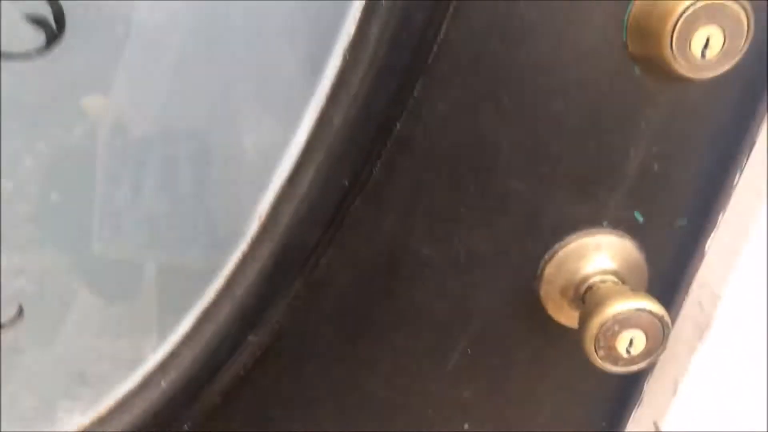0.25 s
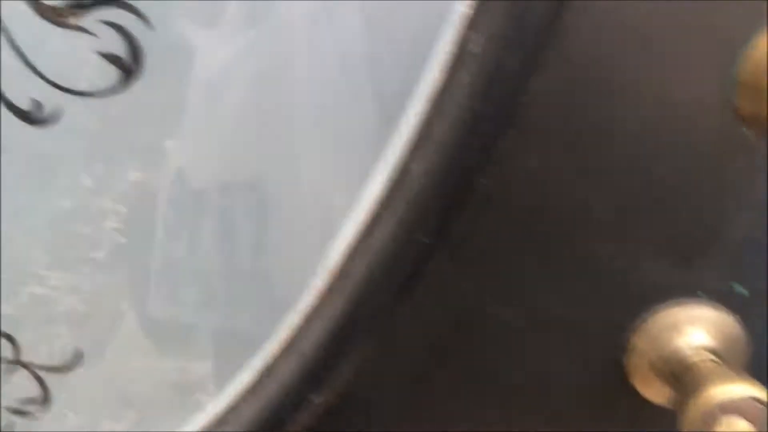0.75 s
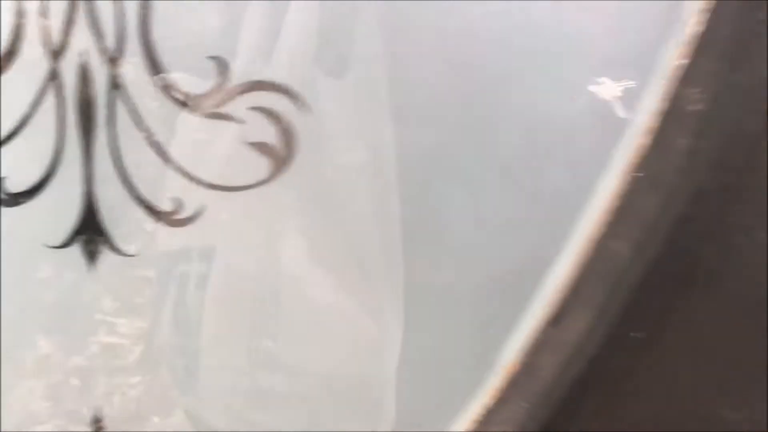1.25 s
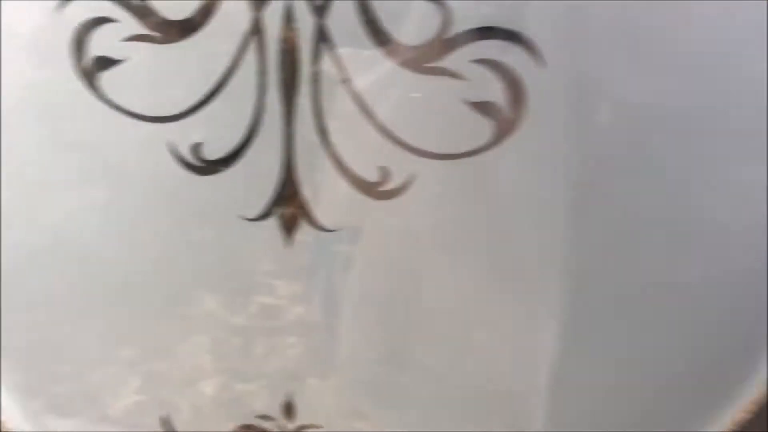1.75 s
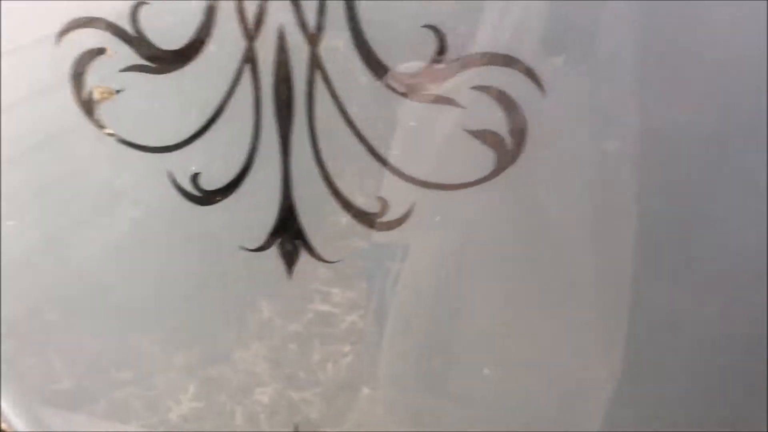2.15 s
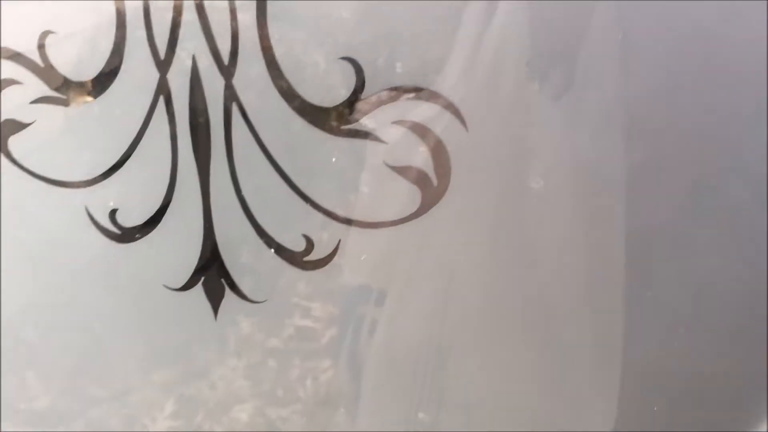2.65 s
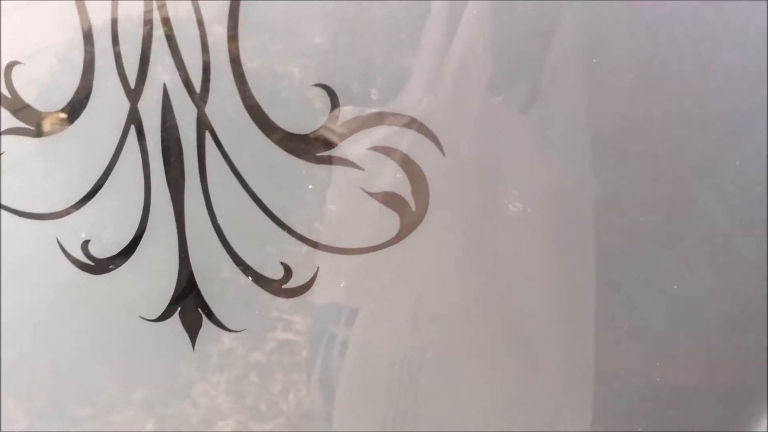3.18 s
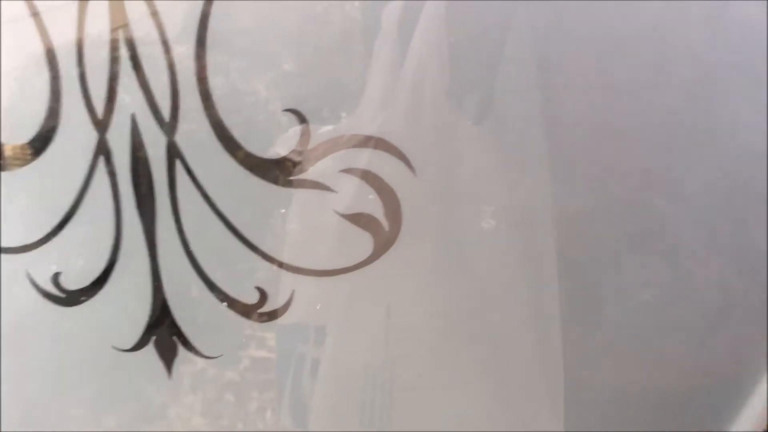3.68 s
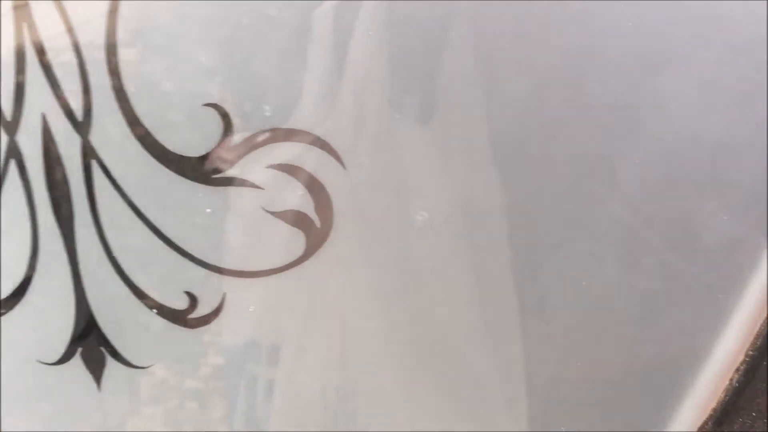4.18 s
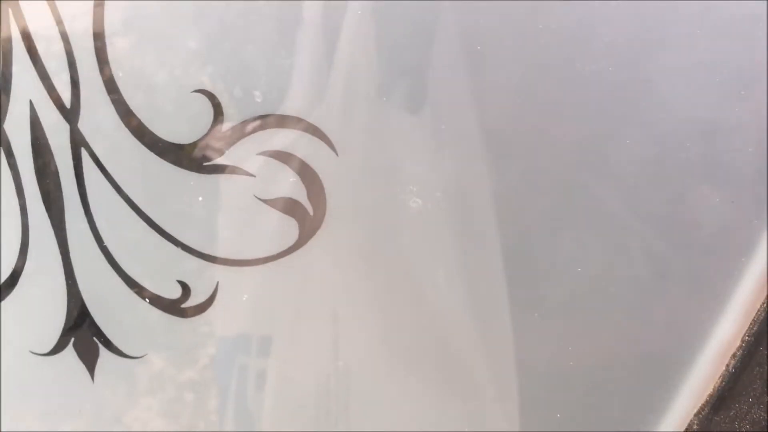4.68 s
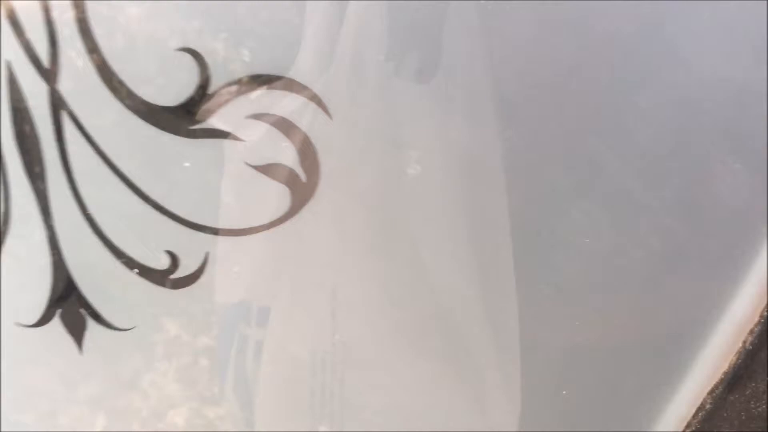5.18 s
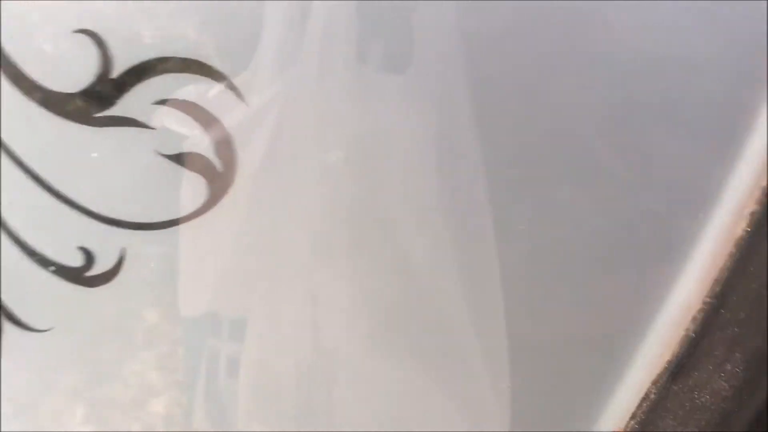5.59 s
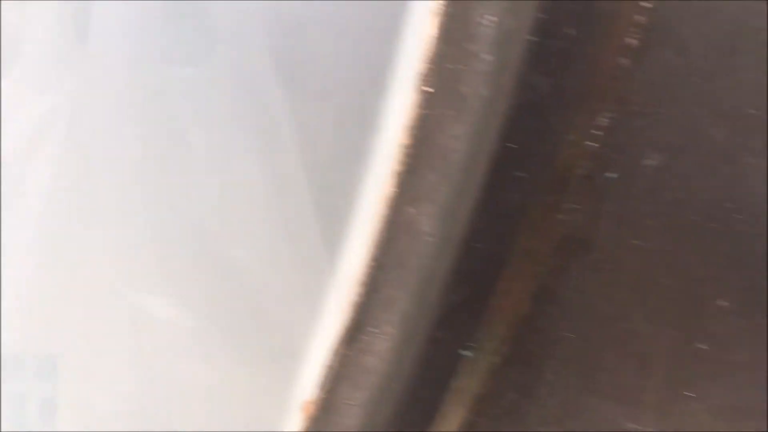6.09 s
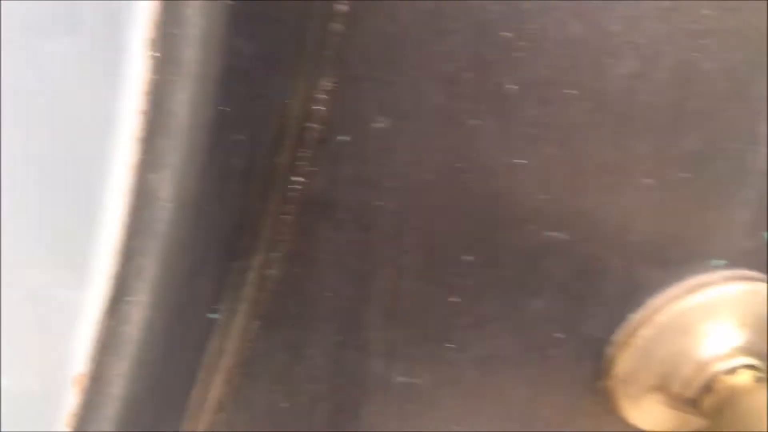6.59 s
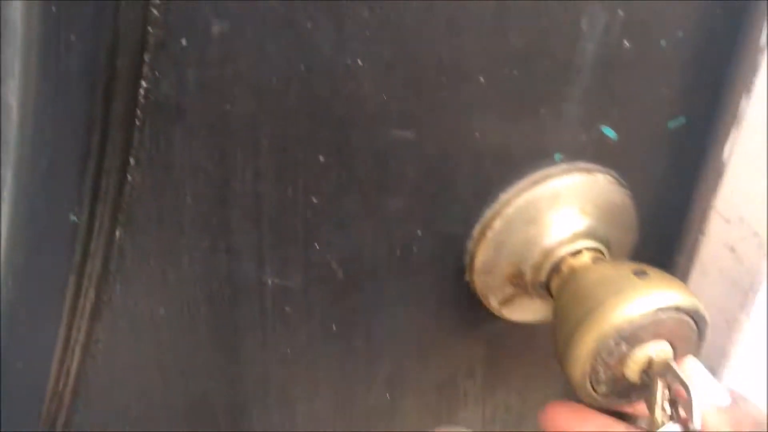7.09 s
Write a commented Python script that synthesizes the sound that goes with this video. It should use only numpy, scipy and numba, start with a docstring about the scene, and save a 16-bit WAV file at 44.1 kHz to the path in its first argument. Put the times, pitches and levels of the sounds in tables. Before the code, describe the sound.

Close to the microphone at a house entrance, a bunch of keys is turned over in a hand: dull, hollow clinks first, then scattered faint ticks, then a brighter jingle. After a sparse stretch with soft thumps, the keys rattle loudly and sharply into the lock, with one dead knock on the knob. Low traffic rumbles far off.

```python
"""A bunch of keys is dug out and turned over in a hand at a house door, then pushed into the lock.
Keys clink, ring and rattle: noisy contacts excite their pitches, the shanks and the hollow of the hand.
Short damped tones, one knock on the knob and low thumps join in, as bursts and dying tones.
Filtered noise makes the rustle, the rubbing, a broad hiss, and the far traffic under a faint hiss of air."""
import sys
import numpy as np
from scipy import signal
from scipy.fft import rfft, irfft
from scipy.io import wavfile
from scipy.ndimage import uniform_filter1d
from numba import njit

SR = 44100
rng = np.random.default_rng(int(sys.argv[2]) if len(sys.argv) > 2 else 0)


def transcribe(signal):
    """Save signal, clipped to [-1, 1], as a 16-bit WAV file at the path in sys.argv[1]."""
    frames = np.atleast_2d(signal).T
    limited = np.clip(frames, -1, 1)
    pcm = np.round(limited * 32767).astype(np.int16)
    wavfile.write(sys.argv[1], SR, pcm)


N = 323694  # length of the scene in samples

# In all tables t60_s is the time to fade by 60 dB.
# Clinks of key on key: peak_s, t60_s (at least 0.004), crack_db, body_db
CLINKS = [(0.111, 0.044, -66, -46), (0.144, 0.094, -42, -34.5), (0.179, 0.077, -36.5, -36),
          (0.2, 0.099, -42, -40), (0.2323, 0.02, -23, -24.5), (0.242, 0.025, -34, -28),
          (0.277, 0.009, -40, -31.5), (0.2995, 0.036, -30.5, -34), (0.3235, 0.0066, -43, -24.5),
          (0.34, .012, -50, -31.5), (0.363, 0.083, -44, -39), (.399, 0.013, -35, -24.5),
          (0.4097, 0.0075, -24.5, -30), (0.424, 0.0096, -55, -28.5), (0.473, 0.024, -58, -34.5),
          (0.491, .014, -59, -38), (0.542, 0.12, -36.5, -36.5), (0.5619, 0.01, -37, -21.5),
          (0.5772, 0.0088, -31, -24), (0.604, 0.011, -40, -35), (0.613, 0.018, -30.5, -43),
          (0.636, .015, -44, -39), (.665, 0.0089, -50, -49), (0.6767, 0.019, -33, -28.5),
          (0.701, 0.0057, -29, -24), (0.7416, 0.019, -37, -38), (0.7725, 0.0079, -48, -20),
          (0.7815, 0.029, -28, -29), (0.8894, 0.017, -47, -40), (0.954, 0.0063, -36, -38.5),
          (0.978, 0.19, -36.5, -50), (1.007, 0.014, -48, -40.5), (1.023, 0.011, -46, -39.5),
          (1.0635, 0.02, -53, -35), (1.101, 0.0051, -35, -44), (1.117, 0.013, -56, -41),
          (1.157, 0.049, -42, -44.5), (1.262, 0.04, -48, -46), (1.5657, 0.015, -42, -38.5),
          (1.5758, 0.011, -25.5, -32), (1.681, 0.048, -38.5, -64), (1.816, 0.0046, -32, -51),
          (2.0774, 0.035, -42.5, -58), (2.12, 0.029, -30, -43), (2.4495, 0.034, -40, -56),
          (2.5044, 0.015, -34.5, -44), (2.713, 0.046, -49.5, -55), (2.774, .015, -41.5, -52),
          (2.819, 0.016, -40, -50), (2.922, 0.055, -36, -46), (2.942, 0.031, -34, -46),
          (2.967, 0.069, -36, -44), (2.9837, 0.05, -36, -45), (3.004, 0.047, -30.5, -36.5),
          (3.0265, 0.023, -31, -38), (3.0303, 0.028, -25.5, -31.5), (3.06, 0.022, -51, -44),
          (3.119, 0.056, -32, -42.5), (3.136, .02, -45, -51), (3.201, 0.053, -25.5, -29),
          (3.234, 0.021, -28, -33), (3.254, 0.027, -23, -32), (3.295, 0.094, -31, -42.5),
          (3.311, 0.028, -31, -40), (3.353, 0.049, -32.5, -36), (3.376, 0.019, -25, -39),
          (3.404, 0.055, -54, -45.5), (3.4395, 0.025, -30, -46), (3.451, 0.034, -34, -56),
          (3.496, 0.03, -36.5, -45.5), (4.026, 0.016, -42.5, -49.5), (4.192, .015, -48, -65),
          (4.243, 0.066, -34.5, -51), (4.282, 0.018, -46, -54), (4.2917, 0.012, -38.5, -47.5),
          (4.359, 0.024, -44.5, -51.5), (4.383, 0.014, -50, -47.5), (4.399, 0.03, -38, -51),
          (4.511, 0.02, -57, -63), (4.527, .03, -42, -50), (4.9587, 0.0094, -74, -59),
          (5.035, 0.016, -58, -56.5), (5.181, 0.015, -63, -53.5), (5.206, 0.026, -70, -60.5),
          (5.358, 0.045, -34, -59), (5.437, 0.046, -31, -51), (5.5233, 0.067, -45, -43.5),
          (5.573, 0.014, -30.5, -42.5), (5.588, 0.016, -33, -48), (5.603, 0.0075, -56, -37),
          (5.7516, 0.023, -38, -56), (5.765, 0.023, -35, -68), (5.915, 0.019, -49, -41.5),
          (5.927, 0.03, -65, -39), (5.9348, 0.012, -65, -41), (6.1452, 0.006, -55, -37.5),
          (6.1632, 0.025, -30.5, -39), (6.2076, 0.029, -21, -45), (6.2607, 0.014, -22, -31.5),
          (6.274, 0.0068, -23, -43), (6.2813, 0.0088, -18.5, -54), (6.332, 0.013, -35.5, -47),
          (6.437, 0.013, -52, -45), (6.458, 0.021, -31.5, -57), (6.5021, 0.092, -32, -46),
          (6.5585, 0.012, -26.5, -58), (6.5668, 0.12, -28.5, -45.5), (6.599, 0.043, -32, -39),
          (6.6218, 0.023, -47, -25.5), (6.676, 0.016, -39, -37), (6.7035, 0.037, -27, -34.5),
          (6.732, 0.049, -25, -48), (6.771, 0.061, -25, -43), (6.8125, 0.019, -23, -44),
          (6.8815, 0.06, -26, -32), (6.903, 0.08, -41, -33), (6.948, 0.013, -43, -30.5),
          (6.9834, 0.0098, -25, -47), (6.986, 0.018, -21.5, -49), (7.0262, 0.017, -45, -56),
          (7.052, .008, -20.5, -41), (7.0587, 0.03, -17, -32), (7.0688, 0.024, -19.5, -32),
          (7.1027, 0.0066, -47, -37.5), (7.14, 0.013, -24, -47), (7.156, 0.0051, -12, -45),
          (7.192, 0.011, -33, -48), (7.205, 0.016, -23, -42), (7.2173, 0.025, -20.5, -42),
          (7.2298, 0.021, -22, -40), (7.243, 0.022, -27, -33), (7.273, .012, -28, -41),
          (7.281, 0.0081, -23, -41.5), (7.321, 0.016, -36, -39)]
# Short faint low thumps: start_s, level_db, t60_s (at most 0.3), bass_db (relative), bass_hz, edge_db (relative)
THUMPS = [(1.214, -48, 0.021, -9, 108, -2), (1.683, -48, 0.14, 11.5, 275, 5),
          (5.394, -59, 0.23, 3.5, 80.7, -30.5), (5.443, -42.5, 0.049, -3, 207, -35),
          (5.535, -46, 0.018, 3, 274, -22), (5.735, -51.5, 0.24, -24, 72.7, -34),
          (5.853, -41, 0.057, 5, 124, -22), (5.885, -48.5, 0.27, 12.5, 72.7, -28),
          (5.925, -43, 0.13, 0, 72.7, -8), (5.991, -36.5, 0.022, -29, 94.2, -7),
          (6.141, -46, 0.19, 6.5, 72.7, -9), (6.167, -50, 0.35, 16, 180, -3),
          (6.196, -41.5, 0.13, 9.5, 72.7, -10), (6.224, -48.5, 0.23, 19.5, 88.8, -19),
          (6.251, -25.5, 0.058, -18, 106, -10.5), (6.274, -40, 0.13, 9, 74, -34),
          (6.327, -44.5, 0.047, -1, 83.4, -14), (6.388, -44.5, 0.035, -10, 73, -12),
          (6.903, -34, 0.063, -15, 300, 3), (7.202, -51, 0.39, 6, 72.7, -20)]
# Pitches at which the keys ring: pitch_hz, level_db (halved in use), t60_s (cut to a fifth in the hand)
KEY_MODES = [(3620, -14, .1), (4560, -12, .1), (5130, -8, .12), (5770, -9, .15), (6350, -9, .1),
             (6980, -11, .1), (7790, -14, .15), (8300, -8, .1), (8620, -6, .06), (9050, -2, .2),
             (9900, -9, .1), (11125, -3, .15), (11760, -6, .2), (12460, -3, .2), (12670, -8, .15),
             (13290, -3, .15), (13960, -3, .12), (14298, -1, .2), (14790, -3, .12), (15325, 0, .15)]
# Tone of the bright cracks: pitch_hz, level_db
CRACK_TONE = [(3000, -31.5), (5000, -2.5), (7000, -4), (9000, -0.5), (10400, -6.5), (12000, -4.5),
              (15000, -2.5), (16500, 8)]
# The hollow of the hand changes with the grip:
# time_s, pitch_hz, width_hz, knock_db (knock in the hollow over clack of the shanks)
HOLLOW = [(0, 2130, 356, 45), (.52, 2134, 358, 45), (.58, 2407, 700, 29), (.7, 2040, 850, -1.5),
          (1.3, 2400, 1554, -10), (1.6, 2080, 860, -3), (2.2, 2300, 850, 11), (2.5, 2400, 356, 8.5),
          (3.25, 2395, 384, 4), (3.45, 2450, 496, -7.5), (3.55, 2230, 2480, -21.5), (4.1, 2344, 2000, 0.5),
          (4.6, 2380, 698, -3.5), (5.3, 2214, 1176, -7.5), (5.8, 2000, 1000, -10), (5.9, 1540, 867, 9),
          (6.1, 1420, 1008, -7.5), (6.6, 3340, 1002, -31), (7.34, 2280, 1517, -1.5)]
# Tone of the rustle: pitch_hz, level_db
RUSTLE_TONE = [(500, -22), (850, -5), (1050, 0), (1300, -7), (2000, -20)]
# Tone of rubbing on the grip: pitch_hz, level_db
GRIP_TONE = [(90, -10.5), (160, 2.5), (300, 2), (480, -2), (640, 2), (850, -7.5), (1500, -31)]
# Pitches of the door panel: pitch_hz, width_hz, level_db
DOOR_MODES = [(330, 120., -8), (470, 120., -7), (650, 55., 0), (980, 250., -10), (1380, 250., -15)]
# A key hangs free and rings until touched: start_s, pitch_hz (nearest key mode is used), level_db, length_s
FREE_RINGS = [(0.23, 11760, -38.5, 0.0073), (0.545, 14790, -44, 0.068), (2.887, 11120, -46, 0.014),
              (2.917, 15320, -36, 0.035), (3.032, 14300, -45, 0.08), (3.13, 13290, -43, 0.069),
              (3.137, 14300, -34, 0.074), (3.171, 5130, -43, 0.027), (3.171, 13290, -43, 0.055),
              (3.293, 14300, -31, 0.028), (3.365, 9050, -51, 0.027), (3.439, 9050, -39, 0.014),
              (3.444, 5130, -46, 0.018), (3.493, 13290, -40, 0.012), (3.445, 14300, -36, 0.011),
              (3.447, 15320, -44, 0.022), (4.243, 8300, -62, 0.045), (4.236, 9050, -51, 0.055),
              (4.246, 13290, -44, 0.028), (5.357, 9050, -50, 0.076), (5.367, 11760, -53, 0.065),
              (5.37, 8300, -61, .06), (5.37, 15320, -49, 0.057), (6.485, 9050, -46, 0.026),
              (6.506, 11760, -46, 0.041), (6.565, 12460, -37, 0.06), (6.567, 15320, -30, 0.071),
              (6.569, 9050, -39.5, 0.066), (6.674, 5770, -45, 0.032), (6.712, 9050, -39, .05),
              (6.73, 7790, -55, .04), (6.77, 14790, -50, 0.06), (6.794, 11120, -37, 0.039),
              (6.885, 11120, -40, 0.05), (6.922, 12670, -32, 0.026), (6.925, 9050, -36.5, 0.02),
              (6.979, 12670, -35, 0.068), (6.994, 8300, -49, .03), (7.171, 9050, -44, 0.025),
              (7.175, 15320, -47, 0.037), (7.23, 14790, -39, 0.09)]
# Soft noises: time_s, rustle_db, grip_db (rubbing), hiss_db (faint broad hiss, nearly steady, level changes)
SOFT_NOISES = [(0, -82, -76, -76.5), (.12, -64.5, -61.5, -79), (.4, -59.5, -63.5, -75),
               (.9, -69, -65.5, -58.5), (1.25, -63.5, -73.5, -64.5), (1.6, -65, -70.5, -61.5),
               (2.2, -70.5, -73, -69), (2.65, -66.5, -72.5, -71.5), (2.8, -58.5, -71, -74),
               (3.1, -62, -71, -59), (3.5, -73.5, -74.5, -69.5), (3.85, -74, -74, -68.5),
               (3.89, -80.5, -77.5, -94), (4.45, -73, -76, -66), (4.85, -80.5, -78, -79.5),
               (5.33, -77.5, -75.5, -77.5), (5.5, -92, -63, -60), (6.05, -76, -66.5, -75.5),
               (6.35, -68, -62.5, -65), (6.7, -52.5, -48.5, -53), (7.0, -57.5, -55, -56),
               (7.34, -71, -53.5, -50)]
# Tone of the key shanks: pitch_hz, level_db
SHANK_TONE = [(1100, -27.5), (2000, -13), (3200, 5), (5000, 0.5), (7000, 0.5)]
# Tone of the far traffic: pitch_hz, level_db
TRAFFIC_TONE = [(15, -50.5), (30, -20), (55, 0), (110, -3), (170, -18.5), (260, -22), (500, -58.5)]
# Tone of the air: pitch_hz, level_db
AIR_TONE = [(100, -26), (400, -9), (1030, 4.5), (2000, 7.5), (4000, -17.5), (10400, -31), (16000, -50)]
# The key bit knocks the door knob once: start_s, level_db, first_pitch_hz, t60_s
KNOB_KNOCK = (6.9036, -12.5, 1500, .012)
# The bunch is shaken and rattles: start_s, held_s (includes the rise), key_rattle_db, hollow_rattle_db
SHAKES = [(0.118, 0.32, -63, -54.5), (.3, 0.033, -44.5, -47), (.39, 0.022, -54, -57), (.44, 0.2, -68, -57),
          (.54, 0.24, -58, -56), (.86, 0.023, -65, -55.5), (0.966, 0.05, -53, -55.5),
          (1.178, 0.042, -48.5, -58), (1.34, 0.14, -80, -62.5), (1.46, 0.11, -55.5, -62),
          (1.69, 0.1, -59, -65), (2.1, 0.062, -61, -64), (2.318, 0.0094, -44.5, -57), (2.5, 0.4, -89, -68),
          (2.892, 0.36, -49, -64), (2.999, 0.091, -48.5, -55), (3.14, 0.33, -57, -64),
          (3.44, 0.028, -51, -59), (3.21, 0.063, -36.5, -48), (4.171, 0.09, -59.5, -66.5),
          (4.478, 0.036, -61.5, -65.5), (5.37, 0.27, -54.5, -72), (5.463, 0.077, -46, -63),
          (5.895, 0.012, -46, -58), (6.149, 0.15, -45, -60), (6.21, 0.049, -36.5, -63),
          (6.421, 0.17, -56, -76), (6.569, 0.19, -38, -49), (6.779, 0.045, -33, -63),
          (6.89, 0.059, -29.5, -49), (6.96, 0.082, -39.5, -56.5), (7.047, 0.027, -44, -44.5),
          (7.09, 0.22, -47.5, -63.5)]
# Level of the low background rumble, drifting at random: time_s, level_db
RUMBLE_LEVEL = [(0, -53.5), (.5, -65), (.8, -56.5), (2.6, -60), (3.2, -55), (4.6, -55.5), (7.34, -54)]
# Tone of the faint broad hiss: pitch_hz, level_db
HISS_TONE = [(900, -11), (2000, 1.5), (4000, -1.5), (7000, -3), (10400, -12), (13000, -12.5), (16000, -2.5)]
# Short faint damped low tones: start_s, peak_db, pitch_hz
DAMPED_TONES = [(.857, -48.5, 1140), (0.953, -42, 1900), (.978, -47.5, 720), (0.979, -41, 1870),
                (1.535, -49, 890), (1.91, -53, 870), (2.05, -52, 960), (2.118, -53, 1950),
                (2.145, -55, 910), (2.294, -52, 980), (2.379, -55.5, 940), (2.44, -51.5, 1030),
                (2.731, -50, 1050), (2.765, -46, 1210), (2.968, -46, 975), (3.03, -33.5, 1905),
                (3.079, -49.5, 990), (5.392, -45.5, 680), (5.733, -52, 700)]
# Tone of the hard edge of a thump: pitch_hz, level_db
EDGE_TONE = [(800, -27), (1300, 2.0), (2000, -10.5), (4000, -12.5), (9000, -31)]

AIR_DB = -83.5
SWELL_DB, SWELLS_PER_S = 1.5, 4.3  # the rumble's slow swell
FIRST_TOUCH_DB = 15  # the first instant of a thump over the burst after it
TONE_T60_S = 0.038
SHAKE_RISE_S, SHAKE_T60_S = 0.0082, 0.07
CLOSING_S, SETTLING_S = 0.00054, 0.0008  # swell before a clink's peak: crack and clack, then the slower knock
WAVER, WAVERS_PER_S = 0.03, 30  # wander of the hollow's pitch, as a share of it before smoothing
SHANK_HZ, SHANK_SPREAD, SHANK_WIDTH_HZ, SHANK_FLAT_DB = 4215, 0.19, 530, -19
GLINT_FLAT_DB, GLINT_WIDTH_HZ = -9, 220.
TOP_HZ = 15700


def gain(db):
    """Turns dB into a plain multiplier."""
    return 10 ** (np.asarray(db) / 20)


def unit(x):
    """Scales a sound to an average (rms) level of 1."""
    return x / np.sqrt(np.mean(x ** 2))


def through(x, shape):
    """Filters x, scaled so that plain noise of level 1 would leave at level 1."""
    return shape(x) / np.std(shape(rng.standard_normal(N)))


def colour(x, points):
    """Gives x the tone in a pitch_hz, level_db table, with a filter that never sounds ahead of its input."""
    hz, db = np.transpose(points)
    size = 4096
    grid = np.maximum(np.arange(size // 2 + 1) * SR / size, 1)
    shape_db = np.interp(np.log(grid), np.log(hz), db)
    # folding the cepstrum (the transform of the log gain) removes any pre-echo
    cepstrum = irfft(np.log(gain(shape_db)))
    cepstrum[1:size // 2] *= 2
    cepstrum[size // 2 + 1:] = 0
    response = irfft(np.exp(rfft(cepstrum)))
    return signal.fftconvolve(x, response)[:len(x)]


def ring(x, hz, t60):
    """Lets x strike one pitch, which starts at the size of the blow and dies away."""
    r = np.exp(-np.log(1000) / (t60 * SR))
    w = 2 * np.pi * hz / SR
    return signal.lfilter([0, np.sin(w)], [1, -2 * r * np.cos(w), r * r], x)


@njit
def moving_bandpass(x, hz, width):
    """Passes a band whose centre and width can move (state-variable filter); gain 1 at the centre."""
    y, band, low = np.empty(len(x)), 0., 0.
    for i in range(len(x)):
        g, k = np.tan(np.pi * hz[i] / SR), width[i] / hz[i]
        v = (band + g * (x[i] - low)) / (1 + g * (g + k))
        band, low, y[i] = 2 * v - band, low + 2 * g * v, k * v
    return y


def fade(length_s, t60, rise_s):
    """Gives the times and a quick rise that dies away by 60 dB in t60, kept within 0.006 to 0.3 s."""
    t = np.arange(int(length_s * SR)) / SR
    fall = np.exp(-np.log(1000) * t / np.clip(t60, .006, .3))
    return t, (1 - np.exp(-t / rise_s)) * fall


def add(out, s, x):
    """Mixes x into out from time s."""
    i = int(s * SR)
    out[i:i + len(x)] += x[:N - i]


def read(table):
    """Reads every column of a timed table at every sample."""
    s, *columns = np.transpose(table)
    return [np.interp(np.arange(N) / SR, s, c) for c in columns]


def steps(k, rows=1):
    """Draws random values that each hold for k samples."""
    return np.repeat(rng.standard_normal((rows, N // k + 1)), k, axis=1)[:, :N]


def wander(k):
    """Smooths random steps of k samples into a wandering line."""
    return uniform_filter1d(steps(k)[0], k)


def contacts(rate, spread_db):
    """Places contacts at random moments, mostly small, a few strong; rate is per second."""
    happens = rng.random(N) < rate / SR
    return happens * gain(spread_db * np.minimum(rng.exponential(size=N), 4))


def rough(hits, t60, steady):
    """Turns each contact into a short burst of noise, over a share of steady noise."""
    burst = signal.lfilter([1], [1, -np.exp(-np.log(1000) / (t60 * SR))], hits)
    return unit((unit(burst) + steady) * rng.standard_normal(N))


def street():
    """Far traffic is low noise that drifts at random; air is a faint steady hiss."""
    swell = unit(wander(int(SR / SWELLS_PER_S)))
    level = gain(read(RUMBLE_LEVEL)[0] + SWELL_DB * swell)
    traffic = level * unit(colour(rng.standard_normal(N), TRAFFIC_TONE))
    return traffic + gain(AIR_DB) * unit(colour(rng.standard_normal(N), AIR_TONE))


def soft_noises():
    """Rustle, rubbing on the grip and a broad hiss are small random bursts of noise over steady noise."""
    rustle_db, grip_db, hiss_db = read(SOFT_NOISES)
    rustle = gain(rustle_db) * unit(colour(rough(contacts(120, 2.5), .03, .6), RUSTLE_TONE))
    grip = gain(grip_db) * unit(colour(rough(contacts(100, 2.5), .05, .9), GRIP_TONE))
    hiss = gain(hiss_db) * unit(colour(rough(contacts(41, 3.6), 0.039, 0.97), HISS_TONE))
    return rustle + grip + hiss


def thumps():
    """A first touch and a burst of noise ring the door panel's pitches, with a bass push and a harder edge."""
    blow, edge, bass, first = np.zeros((4, N))
    for s, db, t60, bass_db, bass_hz, edge_db in THUMPS:
        env = gain(db) * fade(.3, t60, 0.00058)[1]
        add(blow, s, env)
        first[int(s * SR)] = gain(db + FIRST_TOUCH_DB)
        add(edge, s, gain(edge_db) * env)
        push = rng.standard_normal(int(.3 * SR)) * fade(.3, t60, 0.0032)[1]
        boom = ring(push, bass_hz, 0.024)
        add(bass, s, gain(db + bass_db) * boom / np.abs(boom).max())

    def door(x):
        """The wider a panel pitch, the faster it dies."""
        return sum(gain(db) * np.sqrt(w) * ring(x, hz, 2.2 / w) for hz, w, db in DOOR_MODES)

    panel = through(blow * rng.standard_normal(N) + first, door)
    hard_edge = through(edge * rng.standard_normal(N), lambda x: colour(x, EDGE_TONE))
    return panel + bass + hard_edge


def damped_tones():
    """Each short faint tone is one pitch that rises at once and dies quickly."""
    out = np.zeros(N)
    for (s, db, hz), turn in zip(DAMPED_TONES, rng.random(len(DAMPED_TONES))):
        t, env = fade(.08, TONE_T60_S, 0.00051)
        add(out, s, gain(db) * env / env.max() * np.sin(2 * np.pi * (hz * t + turn)))
    return out


def knob():
    """A hard, dead knock of two or three cycles whose pitch drops as the contact spreads."""
    s, db, hz, t60 = KNOB_KNOCK
    t, env = fade(.05, t60, 0.0015)
    falling_hz = hz * (.4 + .6 * np.exp(-t / .0015))
    turns = np.cumsum(falling_hz) / SR
    out = np.zeros(N)
    add(out, s, -gain(db) * env * np.sin(2 * np.pi * turns))
    return out


def free_keys():
    """One pitch of a free key fades slowly, then a finger stops it."""
    out = np.zeros(N)
    for (s, hz, db, length_s), turn in zip(FREE_RINGS, rng.random(len(FREE_RINGS))):
        t, env = fade(length_s + .03, 0.15, 0.00028)
        stop = np.exp(-np.maximum(t - length_s, 0) / 0.0013)
        mode_hz = min((mode[0] for mode in KEY_MODES), key=lambda f: abs(f - hz))
        tone = np.sqrt(2) * np.sin(2 * np.pi * (mode_hz * t + turn))
        add(out, s, gain(db) * env * stop * tone)
    # neighbours brush the key, so its ring flutters
    return out * gain(4 * wander(int(.004 * SR)))


def shaking():
    """Rattle strength on keys and hollow: each shake rises, holds and dies away."""
    t = np.arange(N) / SR
    power = np.zeros((2, N))
    for s, held_s, *db in SHAKES:
        rise = np.clip((t - s) / SHAKE_RISE_S, 0, 1)
        fall = np.exp(-np.log(1000) * np.maximum(t - s - held_s, 0) / SHAKE_T60_S)
        power += np.outer(gain(db), rise * fall) ** 2
    return np.sqrt(power)


def strikes(knock_over_clack_db):
    """Noisy force of each clink on metal, hollow and shank: it swells as keys close up, then dies."""
    metal, knock, clack = force = np.zeros((3, N))
    lead_s = .03  # room for the swell before the peak
    t = np.arange(int(.2 * SR)) / SR - lead_s
    for s, t60, crack_db, body_db in CLINKS:
        fall = -np.log(1000) * t / max(t60, .004)
        parts = (metal, crack_db, CLOSING_S), (knock, body_db, SETTLING_S), (clack, body_db, CLOSING_S)
        for row, db, swell_s in parts:
            add(row, s - lead_s, gain(db) * np.exp(np.where(t < 0, t / swell_s, fall)))
    # the grip shares out the body between hollow and shanks
    knock_share = 1 / (1 + gain(-2 * knock_over_clack_db))
    knock *= np.sqrt(knock_share)
    clack *= np.sqrt(1 - knock_share)
    # a clink is a chatter of tiny contacts, not one smooth push
    chatter = gain(3.5 * np.clip(steps(SR // 900)[0], -2, 1))
    return force * unit(chatter) * rng.standard_normal((3, N))


def keys(key_rattle, hollow_rattle):
    """Clinks and many small contacts crack, ring the keys, and sound the shanks and the hollow of the hand."""
    hz, width, knock_over_clack_db = read(HOLLOW)
    # the hollow's pitch wanders as the fingers shift
    hz = hz * (1 + WAVER * wander(int(SR / WAVERS_PER_S)))
    metal, knock, clack = strikes(knock_over_clack_db)
    hits = contacts(900, 2.6)
    metal += key_rattle * rough(hits, 0.014, 0.3)
    rub = hollow_rattle * rough(hits, .02, .45)

    def held_keys(x):
        """Every 21 ms other key pitches, drawn at random, stand out; fingers shorten the ring."""
        luck = np.clip(steps(int(0.021 * SR), len(KEY_MODES)), -3, 1.3)
        modes = zip(KEY_MODES, luck)
        return sum(ring(x * gain(db / 2 + 7 * u), f, .2 * t60) for (f, db, t60), u in modes)

    # two bands in a row, the second twice as wide, make the hollow
    hollow = through(knock + rub, lambda x: moving_bandpass(moving_bandpass(x, hz, width), hz, 2 * width))

    k = int(.015 * SR)
    # every 15 ms two other pitches of the shanks, drawn at random, stand out
    shank_pitches = SHANK_HZ * np.exp(SHANK_SPREAD * np.clip(steps(k, 2), -2, 2))
    shank_width = np.full(N, SHANK_WIDTH_HZ)

    def shanks(x):
        """Two moving pitches stand out over a fainter broad clack."""
        x = colour(x, SHANK_TONE)
        return gain(SHANK_FLAT_DB) * x + sum(moving_bandpass(x, p, shank_width) for p in shank_pitches)

    # a tight grip sings in a narrow hollow and muffles the shanks
    shank = through(clack + np.minimum(width / 1000.0, 1) * rub, shanks)

    # every 15 ms three key pitches, drawn at random, stand out in the cracks
    choices = rng.choice(np.array(KEY_MODES)[:, 0], (3, N // k + 1))
    glint_pitches = np.repeat(choices, k, axis=1)[:, :N]
    glint_width = np.full(N, GLINT_WIDTH_HZ)

    def crack(x):
        """Three key pitches glint over a fainter bright crack."""
        x = colour(x, CRACK_TONE)
        return gain(GLINT_FLAT_DB) * x + sum(moving_bandpass(x, p, glint_width) for p in glint_pitches)

    cracks = through(metal, crack)
    ringing = gain(-7.5) * through(metal + clack, held_keys)
    return cracks + ringing + hollow + shank


def scene():
    """Keys, knocks and soft noises at the door, over the street."""
    near = soft_noises() + keys(*shaking()) + free_keys() + thumps() + knob() + damped_tones()
    # door and porch return a short faint tail
    tail = fade(.2, 0.084, 0.016)[1] * rng.standard_normal(int(.2 * SR))
    porch = signal.fftconvolve(near, tail / np.sqrt(np.sum(tail ** 2)))[:N]
    return (near + gain(-16) * porch + street())[None]


def record(dry):
    """Drops the deepest bass, below about 36 Hz, and cuts the top sharply."""
    dry = signal.sosfilt(signal.butter(4, 36, "high", fs=SR, output="sos"), dry)
    return signal.sosfilt(signal.ellip(10, .2, 75, TOP_HZ, fs=SR, output="sos"), dry)


dry = scene()
out = record(dry)
transcribe(out)
```